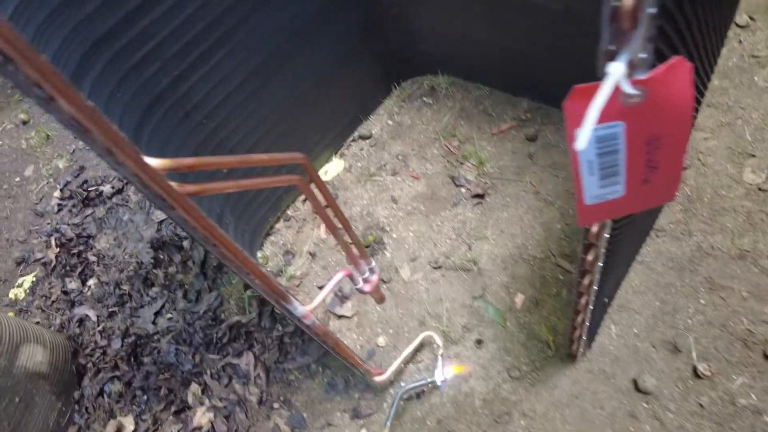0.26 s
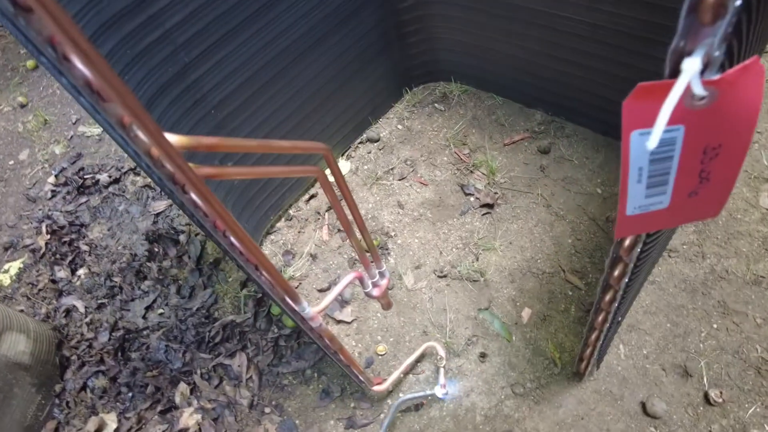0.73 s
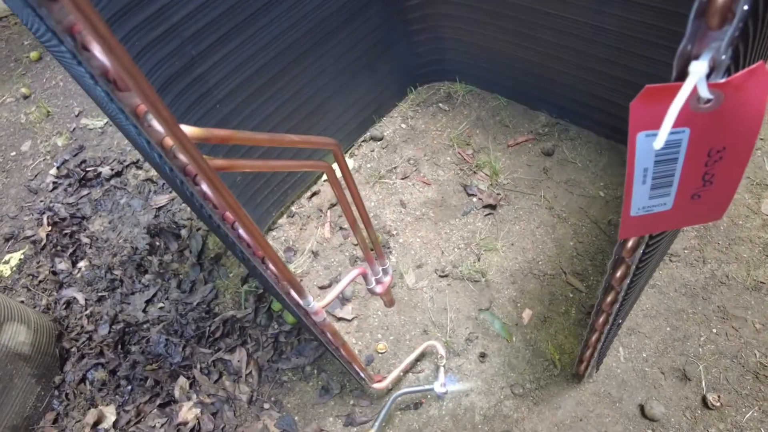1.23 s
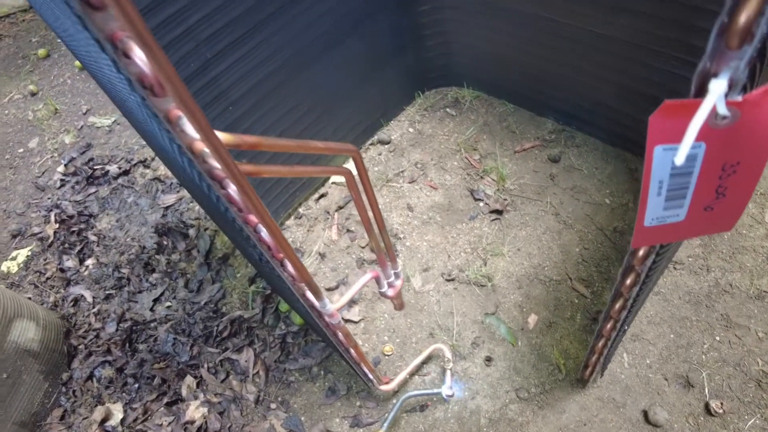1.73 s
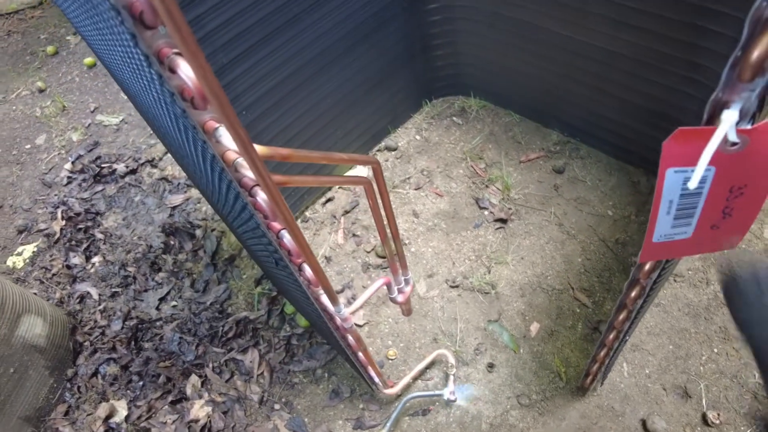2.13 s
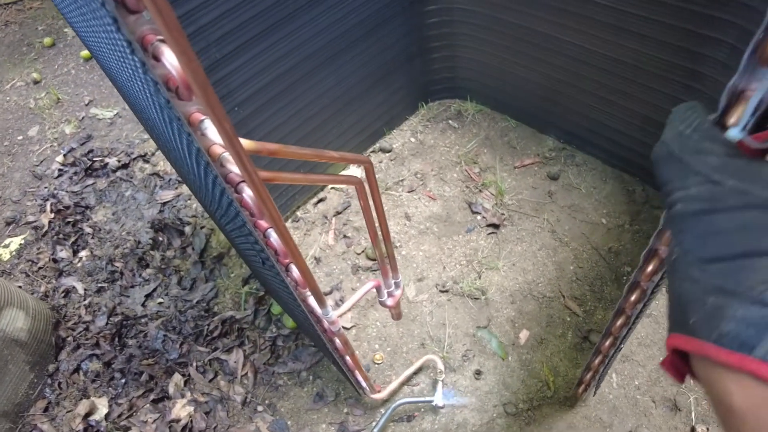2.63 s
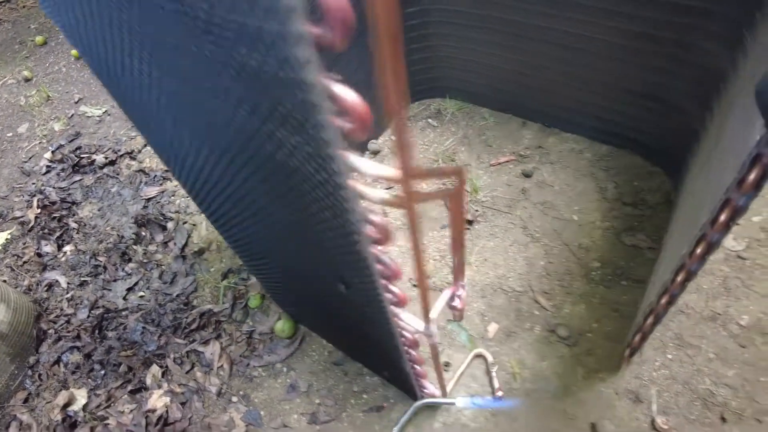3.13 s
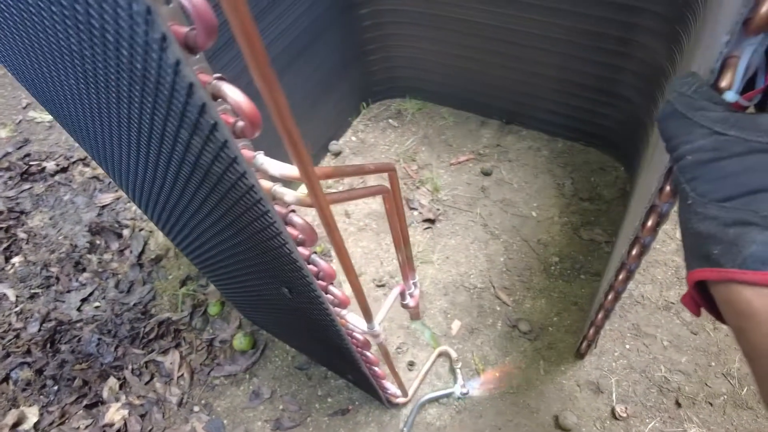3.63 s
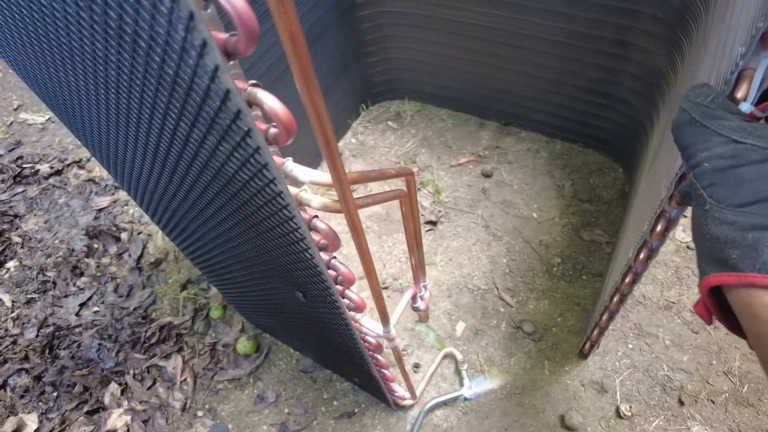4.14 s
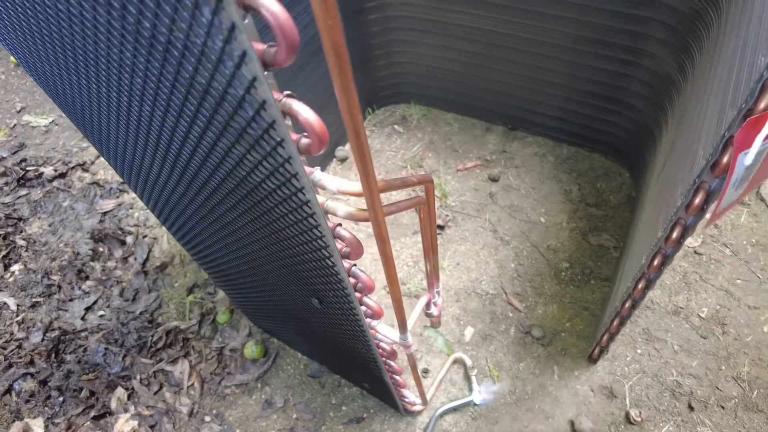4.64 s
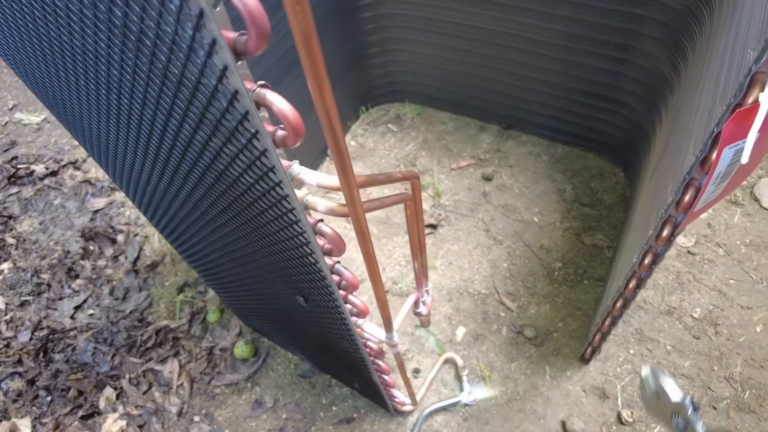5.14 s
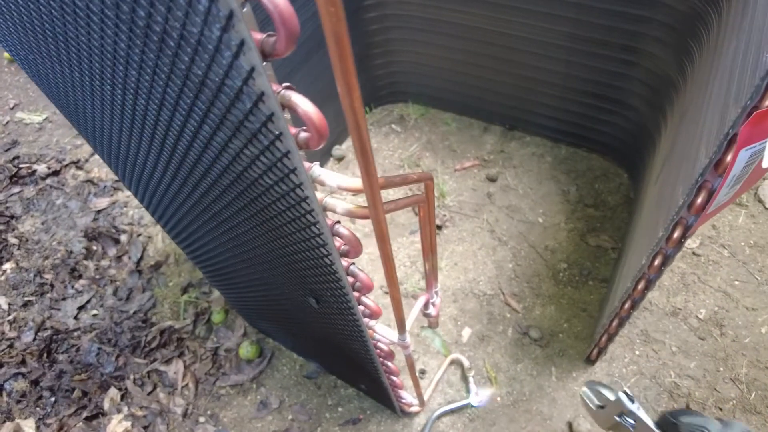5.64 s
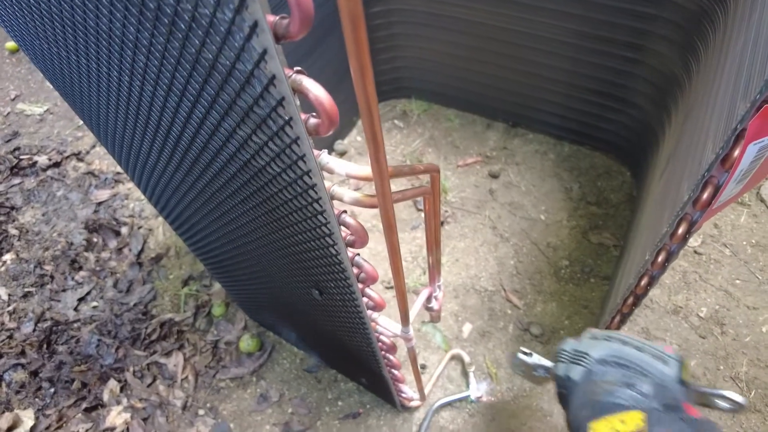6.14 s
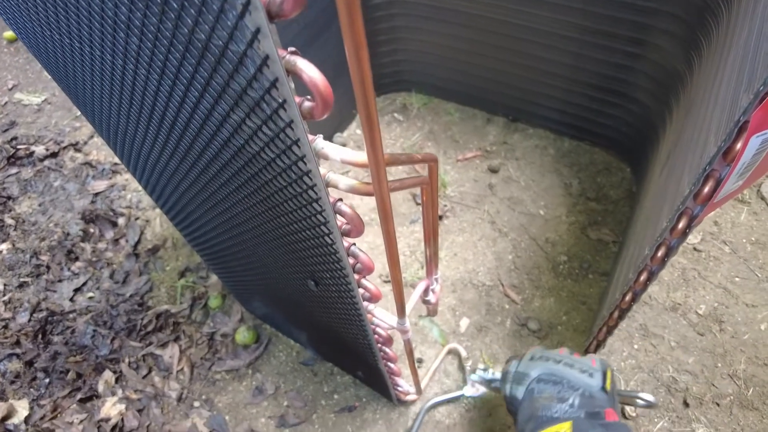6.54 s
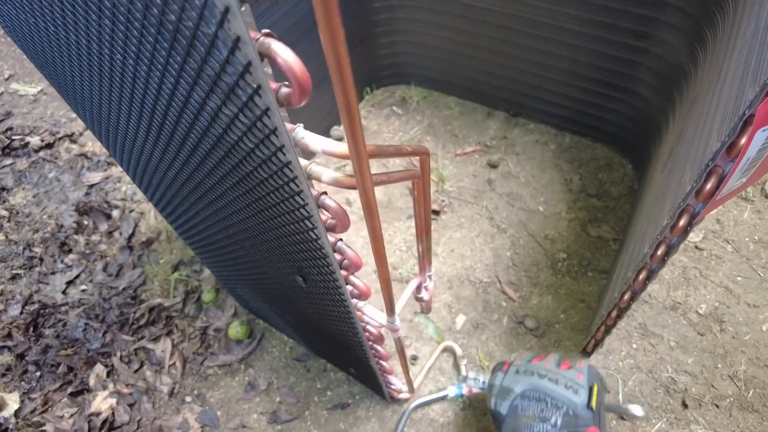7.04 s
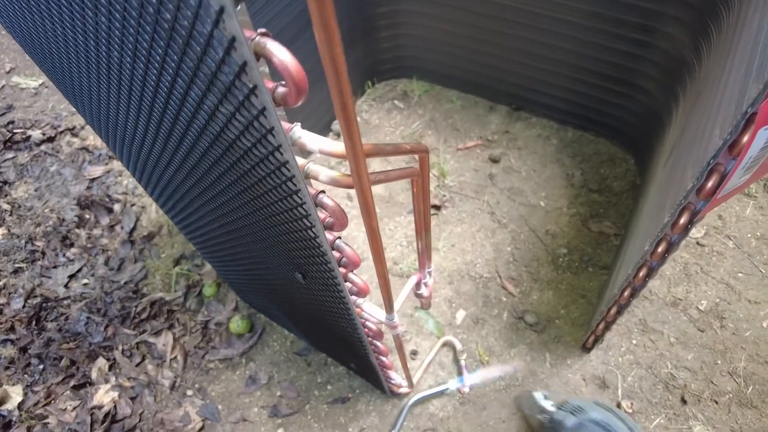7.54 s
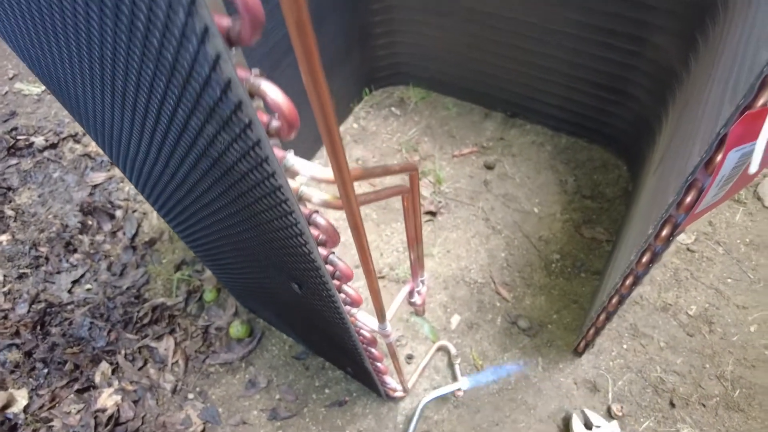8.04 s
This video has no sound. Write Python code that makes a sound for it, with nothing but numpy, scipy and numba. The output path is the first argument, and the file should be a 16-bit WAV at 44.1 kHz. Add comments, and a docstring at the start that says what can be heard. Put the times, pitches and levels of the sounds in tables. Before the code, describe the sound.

A gas torch hisses and whistles steadily while its flame roars and sizzles against copper pipe.

```python
"""Near the ground between the finned walls of a coil: a gas torch, on a camera's stereo microphone above.
The jet hisses and whistles, and the ground echoes it with a lag that follows the tip's height.
The flame roars, sizzles and rumbles as it washes over a copper pipe, and blows breathy notes across it.
It stutters once, early, with a pop; a steel tool ticks near the end. Fins and walls colour the sound."""
import sys
import numpy as np
from scipy import signal
from scipy.fft import rfft, irfft
from scipy.io import wavfile
from scipy.ndimage import uniform_filter1d, map_coordinates
from numba import njit

SR = 44100
rng = np.random.default_rng(int(sys.argv[2]) if len(sys.argv) > 2 else 0)


def dump(signal):
    """Clip the signal to [-1, 1] and save it as 16-bit WAV at the path in sys.argv[1]."""
    limited = np.clip(np.atleast_2d(signal).T, -1, 1)
    pcm = np.round(limited * 32767).astype(np.int16)
    wavfile.write(sys.argv[1], SR, pcm)


N = 365148
TIME = np.arange(N) / SR
HZ = np.arange(N // 2 + 1) * SR / N + 1e-3

# Balance at the torch: t/s, jet hiss/dB, whistle/dB, roar on the pipe/dB
TORCH_LEVELS = [(0, -30.5, -23, -33.5), (.2, -30, -30, -31.5), (.36, -28, -27, -35), (.5, -29.5, -33, -42),
                (.72, -31, -22, -41), (.95, -31.5, -31.5, -35), (1.25, -30, -27, -42),
                (1.42, -28.5, -29, -40), (1.54, -31, -25, -38), (1.68, -34, -33, -37),
                (1.88, -33, -28, -36), (2.3, -33.5, -30, -35), (2.68, -31, -28, -36.5),
                (2.8, -27.5, -22.5, -50), (3.3, -24.5, -26.5, -38), (3.37, -25, -29, -36),
                (3.45, -31, -42, -30), (3.65, -27, -35, -28), (4.0, -32.5, -31, -29.5),
                (4.4, -38, -32, -29.5), (4.8, -37, -38, -28), (5.65, -38, -38, -26.5),
                (5.95, -26, -30.5, -27.5), (6.2, -34.5, -33, -31.5), (6.6, -32.5, -43, -31),
                (6.8, -32, -34, -31), (7.3, -27, -43, -33.5), (7.54, -31, -33, -33),
                (7.65, -23.5, -37, -42.5), (7.8, -28.5, -31, -32.5), (8.0, -24, -28.5, -38.5),
                (8.28, -24.5, -30, -43)]
# Colour of the jet: f/Hz, level/dB
JET_SPECTRUM = [(600, -12), (1500, -2), (2500, 0.5), (3500, 4.5), (5000, -2.5), (7000, -6.5), (10000, -17),
                (16000, -26)]
# Resonances on the jet: f/Hz, width/Hz, lift/dB
JET_RESONANCES = [(3630, 330, 1.5), (5690, 480, 3.5), (6150, 670, 9.5)]
# Tip moving over the ground: t/s, echo lag/ms, echo strength/0-1, jet brightness at 6 kHz/dB
TIP_PATH = [(0, .17, .5, 4.5), (.3, 0.22, 0.13, -4), (.47, 0.25, .75, 1), (.68, .22, 0.4, 6.5),
            (1.1, 0.23, 0.16, 5), (1.4, 0.25, .75, 4), (1.7, 0.23, 0.31, 7.5), (2.6, 0.2, 0.07, 4),
            (2.75, .2, 0.4, 2), (2.95, .29, 0.46, -4), (3.05, .26, .8, -6), (3.15, .2, 1, -6),
            (3.25, .25, 0.73, 2.5), (3.43, .14, 0.43, -3.5), (3.6, 0.11, 0.16, -12), (4.1, 0.14, 0.24, 2),
            (4.5, 0.14, 0, -1), (5.0, 0.3, 0.3, 1), (5.4, .23, 0.1, -2), (5.95, 0.17, 0.14, 1.5),
            (6.5, 0.21, 0.07, -2.5), (7.4, 0.27, 0.02, -12), (7.52, 0.14, 0.1, 4), (7.66, 0.253, 0.75, -2),
            (7.75, 0.21, 0.54, 1.5), (7.88, 0.2, 0.5, -1), (8.0, 0.27, 0.75, -1.5), (8.1, .42, 0.75, 0),
            (8.18, 0.56, 0.75, 0.5), (8.28, 0.6, 0.7, -2)]
# Pitch of the whistle: t/s, f/Hz
WHISTLE_PITCH = [(0, 4300), (.12, 4620), (.34, 4450), (.5, 4230), (.68, 4420), (1.5, 4290), (2.5, 4380),
                 (2.85, 4260), (4.2, 4320), (4.6, 4490), (5.0, 4260), (5.75, 4460), (6.7, 4250),
                 (8.28, 4330)]
# Colour of the roar: f/Hz, level/dB
ROAR_SPECTRUM = [(500, -35), (1100, -2), (1350, 2), (2000, 1), (2400, -2.5), (2800, -2), (4500, -20.5),
                 (8000, -38)]
# Resonances on the roar: f/Hz, width/Hz, lift/dB
ROAR_RESONANCES = [(1326, 57, 3.9), (1660, 28, 2.1), (1954, 52, 3.8), (2284, 79, 10.2)]
# Colour of the sizzle: f/Hz, level/dB
SIZZLE_SPECTRUM = [(3000, -23), (5500, -1), (7000, 2.5), (8500, -3.5), (9500, -3.5), (10500, -15),
                   (16000, -33)]
# Colour of the thin top hiss: f/Hz, level/dB
TOP_SPECTRUM = [(6000, -30), (9500, -2), (11000, 3.5), (13000, -5), (14700, 0.5), (16000, -6.5)]
# Treble between flares: t/s, sizzle/dB, top hiss/dB
TREBLE_LEVELS = [(0, -32.5, -41), (1.0, -36.5, -39.5), (2.6, -35, -40.5), (3.35, -32, -35.5),
                 (3.55, -50, -41), (3.8, -43, -35.5), (4.0, -32, -41), (5.2, -31.5, -39), (6.1, -31.5, -39),
                 (6.6, -35, -39), (7.4, -34.5, -39), (8.28, -37, -38.5)]
# Sizzle and top hiss flare together: t/s, length/s, lift/dB
TREBLE_FLARES = [(.03, 0.15, 6), (.6, 0.19, 4.5), (1.3, 0.31, 1.5), (1.75, 0.27, 2.5), (2.75, 0.18, 3.5),
                 (3.2, 0.25, 1), (3.96, 0.3, 4), (4.52, 0.22, 4.5), (4.85, 0.16, 5), (5.3, 0.66, 4),
                 (6.72, .28, 2), (7.5, 0.25, 5.5), (7.75, .12, 3), (8.03, .2, 2.5)]
# Colour of the rumble: f/Hz, level/dB
RUMBLE_SPECTRUM = [(20, -9), (40, -1.5), (70, -8.5), (120, -5), (200, -7), (330, 0.5), (500, -4), (600, -1),
                   (850, -4), (1300, 0), (2000, -39)]
# The rumble swells or sinks: t/s, length/s, lift/dB
RUMBLE_LIFTS = [(0, .08, 2), (2.72, .15, 0), (3.35, 0.58, 1.5), (6.74, 0.53, 3), (7.72, 0.27, 3),
                (8.06, .3, -4)]
# Flame blowing across the pipe: t/s, length/s, f/Hz, level/dB
PIPE_NOTES = [(0.149, .09, 700, -34), (.45, 1.5, 1776, -37), (2.4, 0.66, 1790, -43.5),
              (4.8, .85, 3770, -36), (7.05, .43, 3490, -42)]
# Lifts during the stutter: jet/dB, whistle/dB, roar/dB, sizzle/dB, rumble/dB
STUTTER_LIFTS = (8, -5, 6.5, -8, 6.5)
# Pop of the flame: t/s, peak/dB, f/Hz, t60/s
POP_RINGS = [(.3205, -11, 330, .0086), (.303, -12, 1860, .038)]
# Rings of the steel tool: f/Hz, peak/dB
TOOL_RINGS = [(7600, -27), (10800, -26), (11600, -28), (14300, -24)]
# Hollow where a wall echo cancels the direct sound: t/s, f/Hz, width/Hz, depth/0-1
WALL_HOLLOW = [(0, 1110, 250, 0.8), (.7, 880, 375, .8), (1.4, 890, 368, .8), (2.0, 1034, 234, 0.6),
               (3.0, 1100, 253, 0.75), (4.3, 1220, 256, 0.7), (4.6, 1100, 395, 0.87), (5.9, 1110, 400, 1),
               (6.2, 1200, 250, 0.43), (7.9, 1140, 250, .75), (8.05, 1050, 400, .95), (8.28, 1000, 400, .9)]
# Standing peaks and dips between the coil walls: f/Hz, width/Hz, lift/dB
WALL_MODES = [(509, 28, -13), (540, 75, 3.5), (724, 24, -7), (780, 86, 4.5), (850, 17, -7.5), (883, 41, 5),
              (1362, 18, -7.5), (2263, 40, -9), (2387, 68, -3.5), (2690, 48, -6.5), (3900, 63, 0),
              (4500, 120, -2), (7150, 120, -4.5), (7900, 200, 0.5), (9230, 240, 3.5), (9400, 430, -0.5)]
# Colour of the diffuse sound: f/Hz, level/dB
DIFFUSE_SPECTRUM = [(60, -2), (1000, -7), (4000, -2.5), (15000, 10.5)]
# Pickup of sound from the side: f/Hz, gain/dB
MIC_SIDE_GAIN = [(60, -20), (300, -17.5), (600, -12), (900, -4.5), (1500, -16.5), (3000, -7), (6000, -8.5),
                 (10000, -10), (15000, -10)]
# Balance of the microphone pair: f/Hz, left minus right/dB
MIC_BALANCE = [(60, 0.5), (200, -0.5), (700, 0.5), (1290, .5), (2380, .7), (3500, 2.5), (4100, 6),
               (4700, 6), (5800, 2), (8120, 0), (11000, -3.5), (15000, 3)]


def undb(db):
    """Decibels to amplitude."""
    return 10 ** (np.asarray(db) / 20)


def curves(table):
    """Each column of a timed table at every sample."""
    s, *columns = np.transpose(table)
    return [np.interp(TIME, s, c) for c in columns]


def colour(x, points, resonances=()):
    """Filter by (f/Hz, level/dB) points, with resonant peaks or dips on top."""
    hz, db = np.transpose(points)
    gain = undb(np.interp(np.log(HZ), np.log(hz), db))
    for centre, width, lift_db in resonances:
        gain = gain * undb(lift_db / (1 + (2 * (HZ - centre) / width) ** 2))
    return irfft(rfft(x) * gain, N)


def walk(rate):
    """Smooth random drift: levels held 1 / rate s and slewed twice."""
    hold = int(SR / rate)
    steps = np.repeat(rng.standard_normal(N // hold + 1), hold)
    return uniform_filter1d(uniform_filter1d(steps, hold), hold)[:N]


def swell(start, length, edge):
    """A 0-1 window with ramps of edge s, centred on its start and end."""
    return np.clip(np.minimum(TIME - start, start + length - TIME) / edge + .5, 0, 1)


def lifts(rows):
    """Sum in dB of soft-edged lifts."""
    return sum(db * swell(s, length, edge=.12) for s, length, db in rows)


@njit
def bandpass(x, hz, width):
    """State-variable band-pass with moving centre, gain 1 there."""
    y, band, low = np.empty(len(x)), 0., 0.
    for i in range(len(x)):
        g, damping = np.tan(np.pi * hz[i] / SR), width[i] / hz[i]
        v = (band + g * (x[i] - low)) / (1 + g * (g + damping))
        band, low = 2 * v - band, low + 2 * g * v
        y[i] = damping * v
    return y


def turbulence(db, points, resonances=(), *, flicker_db, gust_db):
    """Two unrelated noises of one colour, direct and diffuse, flickering with the eddies."""
    x = colour(rng.standard_normal((2, N)), points, resonances)
    return x / x.std() * undb(db + flicker_db * walk(45) + gust_db * walk(12))


def cavity_tone(db, hz, width_hz):
    """Eddies ring a small cavity: a narrow, fluttering band, direct and diffuse."""
    hz = hz * (1 + .0066 * walk(8))
    x = np.array([bandpass(v, hz, width_hz + np.zeros(N)) for v in rng.standard_normal((2, N))])
    band_rms = np.sqrt(np.pi / SR * width_hz)
    return x / band_rms * undb(db + 1.3 * walk(40))


def jet(db):
    """Hiss of the gas jet; its upper part swells as the nozzle turns."""
    x = turbulence(db + 1, JET_SPECTRUM, JET_RESONANCES, flicker_db=1.14, gust_db=1.57)
    upper = np.array([bandpass(v, np.full(N, 6000.), np.full(N, 2500.)) for v in x])
    _, _, brightness_db = curves(TIP_PATH)
    return x + (undb(brightness_db) - 1) * upper


def off_ground(x):
    """Direct sound plus its echo off the ground; their comb slides as the tip rises."""
    lag_ms, strength, _ = curves(TIP_PATH)
    # the flame is a long, wavering source, so the lag trembles and blurs the upper notches
    delayed = np.arange(N) - (lag_ms + .015 * walk(150)) * SR / 1000
    # loose soil scatters the treble out of the echo
    dulled = signal.filtfilt(*signal.butter(2, 9500, fs=SR), x)
    return x + strength * np.array([map_coordinates(v, [delayed], order=3) for v in dulled])


def whistle(db):
    """The jet rings a cavity at a wandering pitch; a weaker whistle is breathier."""
    full_db, wider_hz_per_db = -27.5, 8
    width_hz = 210 + wider_hz_per_db * np.clip(full_db - db, 0, None)
    wavering_db = db + 1.4 * walk(6)
    hz = curves(WHISTLE_PITCH)[0] * (1 + .008 * walk(2.8))
    return cavity_tone(wavering_db, hz, width_hz)


def roar(db):
    """The flame washes over the copper pipe: resonant midrange turbulence."""
    return turbulence(db, ROAR_SPECTRUM, ROAR_RESONANCES, flicker_db=1, gust_db=.56)


def sizzle(db):
    """Treble turbulence of the flame on the pipe."""
    return turbulence(db, SIZZLE_SPECTRUM, flicker_db=.74, gust_db=1)


def top_hiss(db):
    """Thin hiss in three neighbouring bands, each flickering alone."""
    x = turbulence(db, TOP_SPECTRUM, flicker_db=1.8, gust_db=-.2)
    low, low_and_mid = (colour(x, [(hz, 0), (hz * 1.2, -60)]) for hz in (10300, 12800))
    return sum(band * undb(1.8 * walk(25)) for band in (low, low_and_mid - low, x - low_and_mid))


def rumble(db):
    """Low turbulence of the burning gas."""
    return turbulence(db, RUMBLE_SPECTRUM, flicker_db=1.54, gust_db=.6)


def fin_echoes(x, db):
    """Echoes off the fins, up to 12 ms late, ripple the spectrum; the ripple shifts as the torch wanders."""
    age = np.linspace(0, 1, int(.012 * SR))
    tails = rng.standard_normal((2, len(age))) * age * np.exp(-4 * age)
    tails = tails * undb(db) / np.sqrt(np.sum(tails ** 2, axis=1, keepdims=True))
    here, there = (signal.fftconvolve(x, tail)[:N] for tail in tails)
    turn = 1.13 * walk(.785)
    return np.cos(turn) * here + np.sin(turn) * there


def coil_walls(x):
    """A wall echo cuts a moving hollow near 1 kHz; standing waves add peaks and dips."""
    hz, width, depth = curves(WALL_HOLLOW)
    for offset in (-.22, .22):  # two close dips make one flat hollow
        x = x - depth * bandpass(x, hz + offset * width, .68 * width)
    return colour(x, [(20, 0), (20000, 0)], WALL_MODES)


def pipe_notes():
    """Each pass over the pipe mouth sounds its own breathy note."""
    return sum(swell(s, length, edge=.3 * length) * cavity_tone(db, hz, width_hz=90)
               for s, length, hz, db in PIPE_NOTES)


def stutter(levels_db):
    """The flame stutters once: jet, roar and rumble jump, whistle and sizzle drop."""
    window = swell(start=.225, length=.105, edge=.03)
    return [db + lift_db * window for db, lift_db in zip(levels_db, STUTTER_LIFTS)]


def ring(start, db, hz, t60):
    """One damped sine, falling 60 dB in t60 s."""
    age = np.clip(TIME - start, 0, None)
    return undb(db - 60 * age / t60) * np.sin(2 * np.pi * hz * age)


def pop():
    """The stuttering flame pops: two short rings."""
    return sum(ring(*row) for row in POP_RINGS)


def tool_tick():
    """A steel tool rings briefly, high in the treble."""
    return sum(ring(7.995, db, hz, t60=.037) for hz, db in TOOL_RINGS)


def microphone_pair(shared, sideways):
    """Sound from the side reaches the two ports with opposite sign."""
    side = colour(sideways, MIC_SIDE_GAIN)
    return np.array([colour(shared + sign * side, [(hz, sign * db / 2) for hz, db in MIC_BALANCE])
                     for sign in (1, -1)])


def scene():
    """The torch with its ground, fin and wall echoes, as the pair above hears it."""
    jet_db, whistle_db, roar_db = curves(TORCH_LEVELS)
    sizzle_db, top_db = curves(TREBLE_LEVELS)
    flare_db = lifts(TREBLE_FLARES)
    rumble_db = -37.5 + lifts(RUMBLE_LIFTS)
    steady_db = jet_db, whistle_db, roar_db, sizzle_db + flare_db, rumble_db
    jet_db, whistle_db, roar_db, sizzle_db, rumble_db = stutter(steady_db)
    sources = [off_ground(jet(jet_db)), off_ground(whistle(whistle_db)), pipe_notes(), roar(roar_db),
               off_ground(sizzle(sizzle_db)), top_hiss(top_db + flare_db), rumble(rumble_db)]
    direct, diffuse = zip(*sources)
    # each source sits elsewhere, so each has its own echoes
    echoes = sum(fin_echoes(x, db=-8.5) for x in direct)
    # thin fins let the long waves through
    echoes = signal.lfilter(*signal.butter(2, 870, "high", fs=SR), echoes)
    shared = coil_walls(sum(direct) + echoes) + pop() + tool_tick()
    sideways = sum(fin_echoes(x, db=0) for x in direct) + colour(sum(diffuse), DIFFUSE_SPECTRUM)
    return microphone_pair(shared, sideways)


def record(dry):
    """The camera cuts the top of the band."""
    return signal.sosfilt(signal.ellip(10, .2, 70, 15760, fs=SR, output="sos"), dry)


dry = scene()
out = record(dry)
dump(out)
```